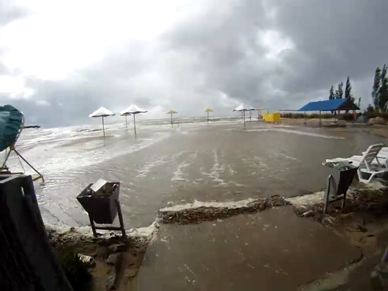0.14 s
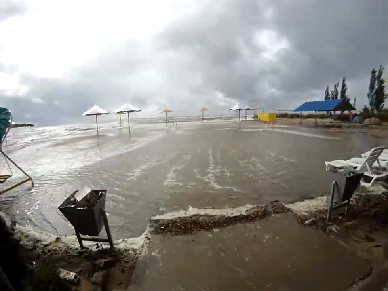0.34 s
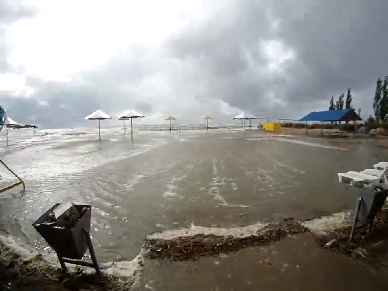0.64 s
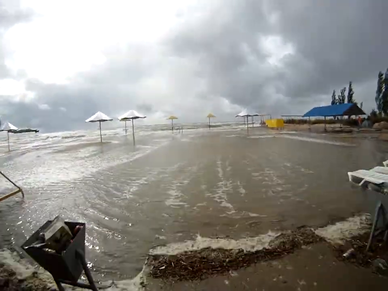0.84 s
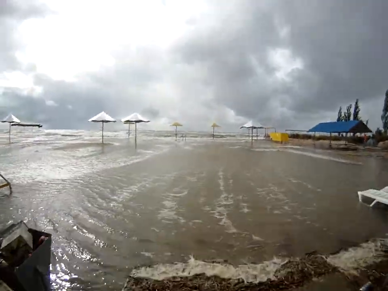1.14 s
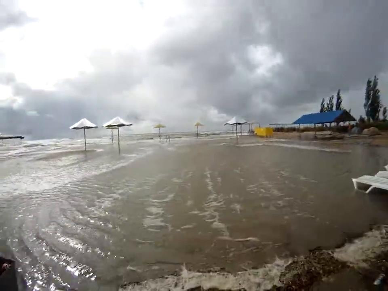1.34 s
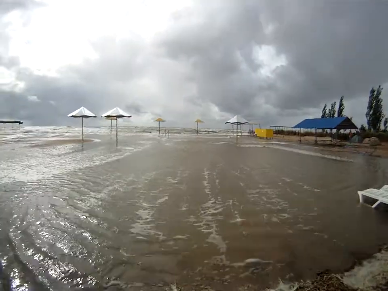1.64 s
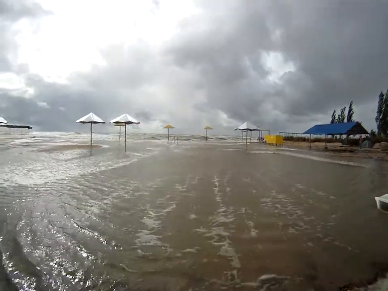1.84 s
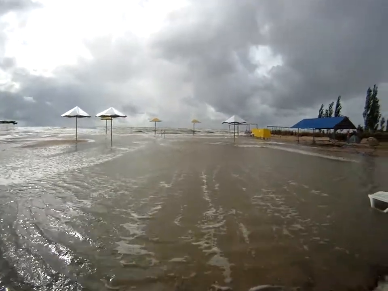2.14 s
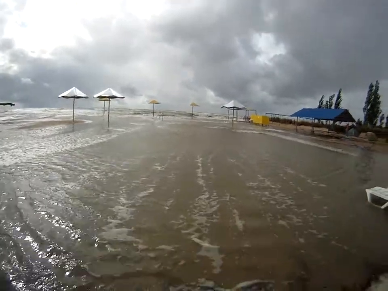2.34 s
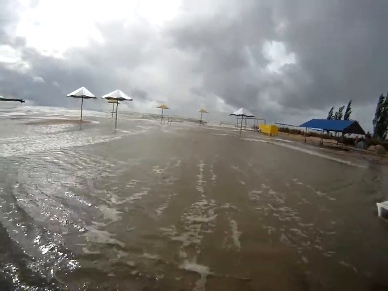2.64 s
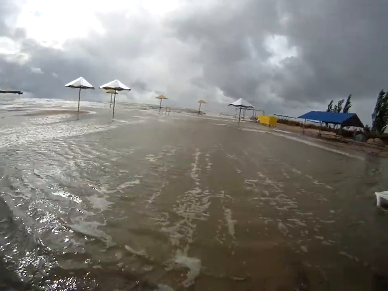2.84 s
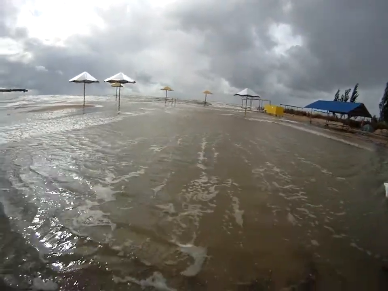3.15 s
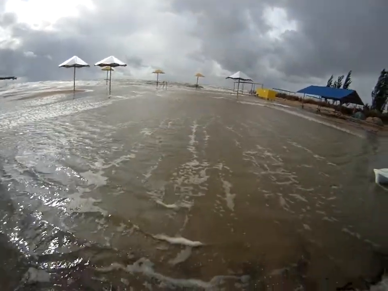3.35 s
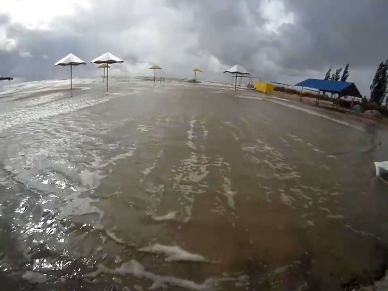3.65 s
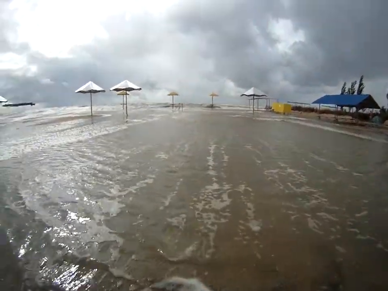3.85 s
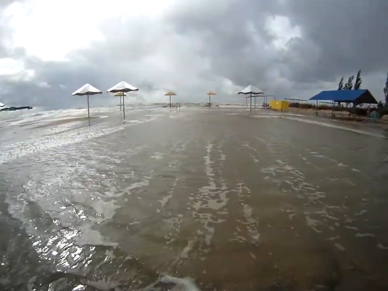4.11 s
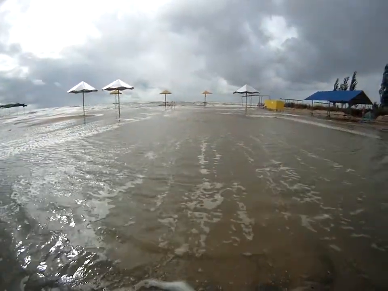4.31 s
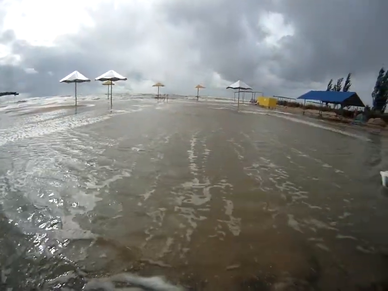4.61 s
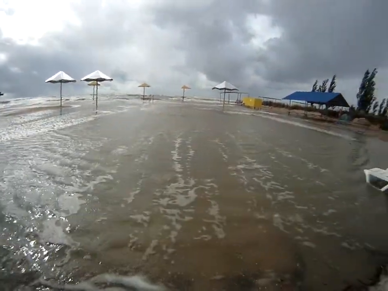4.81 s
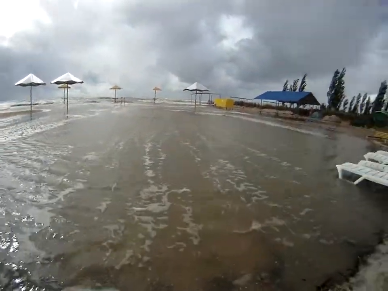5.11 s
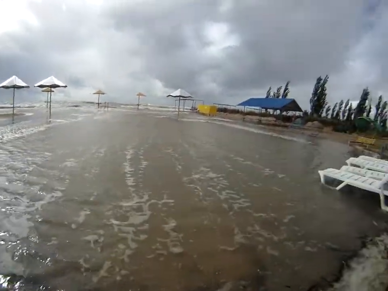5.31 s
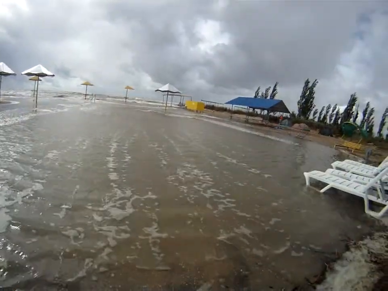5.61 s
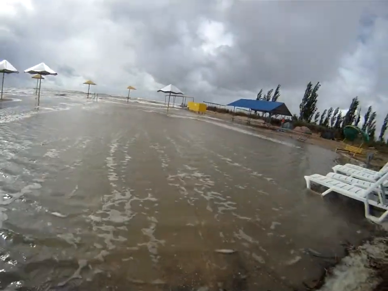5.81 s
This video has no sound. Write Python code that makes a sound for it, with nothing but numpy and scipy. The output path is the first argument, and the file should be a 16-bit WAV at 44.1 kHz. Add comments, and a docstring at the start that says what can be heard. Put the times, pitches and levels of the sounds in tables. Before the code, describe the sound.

A wet hand knocks, rubs and squeaks on a sealed plastic camera case, over dull hissing floodwater and gusting wind.

```python
"""Storm surf floods a beach in strong wind, heard from inside a hand-held camera's sealed plastic case.
The wash comes through the ringing case as a dull hiss, and gusts rumble on it.
Close by, knocks ring the case, a wet grip swishes and squeaks over it,
and its mount slips in two short runs of creaks."""
import sys
import numpy as np
from scipy import signal
from scipy.fft import rfft, irfft, next_fast_len
from scipy.io import wavfile
from scipy.ndimage import uniform_filter1d, map_coordinates

SR = 44100
rng = np.random.default_rng(int(sys.argv[2]) if len(sys.argv) > 2 else 0)


def output_pcm(signal):
    """Save a mono or channel-first signal as 16-bit PCM at the path in sys.argv[1].

    Samples are clipped to [-1, 1] before scaling.
    """
    pcm = np.clip(np.atleast_2d(signal).T, -1, 1) * 32767
    wavfile.write(sys.argv[1], SR, np.round(pcm).astype(np.int16))


N = 263263


def amp(db):
    """Decibels to gain."""
    return 10 ** (np.asarray(db) / 20)


def unit(x):
    """Scale to rms 1."""
    return x / np.sqrt(np.mean(x ** 2) + 1e-20)


def burst(x):
    """Scale to the energy of 10 ms at rms 1."""
    return x * np.sqrt(SR / 100 / (np.sum(x ** 2) + 1e-20))


def curve(points):
    """(seconds, value) points to one value per sample."""
    times_s, values = np.transpose(points)
    return np.interp(np.arange(N) / SR, times_s, values)


def wobble(rate_hz):
    """Smooth random curve with knots at rate_hz."""
    knots = rng.standard_normal(int(N * rate_hz / SR) + 4)
    return map_coordinates(knots, [np.arange(N) * rate_hz / SR])


def patchy(depth_db):
    """Noise whose gain drifts in patches of time and frequency; rms 1."""
    spectra = signal.stft(rng.standard_normal(N), nperseg=512)[2]
    patches = uniform_filter1d(rng.standard_normal(spectra.shape), size=6, axis=0)
    patches = unit(uniform_filter1d(patches, size=12, axis=1))
    return unit(signal.istft(spectra * amp(depth_db * patches), nperseg=512)[1][:N])


def grains(rate_hz, spread_db):
    """Random impulses of uneven size; rms 1."""
    impulses = (rng.random(N) < rate_hz / SR) * rng.choice([-1, 1], N)
    return unit(impulses * amp(spread_db * np.clip(rng.standard_normal(N), -2, 2)))


def filtered(x, response):
    """Zero-phase filter with gain response(hz)."""
    size = next_fast_len(N + SR // 2)
    return irfft(rfft(x, size) * response(np.fft.rfftfreq(size, 1 / SR)), size)[:N]


def through_case(x, spectrum):
    """Colour x by (Hz, dB) points and by the case's resonances; rms 1."""
    # Case resonances and notches. Each row: centre in Hz, width in Hz, lift in dB.
    resonances = [(897, 107, 4.5), (1274, 144, 6), (2140, 310, 7.5), (3654, 335, 10), (5990, 470, -7),
                  (8410, 430, 10.5), (9770, 560, 11.5), (11980, 1230, -15), (14270, 400, 10)]
    points_hz, points_db = np.transpose(spectrum)

    def response(hz):
        source_db = np.interp(np.log(hz + 1), np.log(points_hz + 1), points_db)
        case_db = sum(db / (1 + (2 * (hz - centre) / width) ** 2) for centre, width, db in resonances)
        return amp(source_db + case_db)
    return unit(filtered(x, response))


def flood():
    """Surf and shallow ripples merge into a wash; flecks of spray tick on the case."""
    # Slow surge. Each row: time in seconds, level in dB.
    surge = [(0, -50), (.6, -49.5), (.95, -51), (1.7, -49), (2.3, -52), (3.7, -51.5), (4.95, -48.5),
             (5.4, -52.5), (5.97, -51)]
    # Spectra of wash and spray. Each row: frequency in Hz, relative density in dB.
    water_spectrum = [(80, -2.5), (200, 3.5), (400, 0), (700, -3), (1250, -2), (1550, -6), (2400, 1.5),
                      (3000, -5), (4200, -10), (5200, -13), (6000, -21), (7100, -15), (9500, -16),
                      (15000, -17)]
    spray_spectrum = [(1500, -36), (4500, 8), (7500, 8), (10000, -36), (15000, -25)]
    foam = patchy(depth_db=2) + 0.37 * grains(rate_hz=400, spread_db=8)
    swell = amp(curve(surge) + 0.5 * wobble(rate_hz=9))
    spray = amp(-78) * through_case(grains(rate_hz=4, spread_db=3), spray_spectrum)
    return swell * through_case(foam, water_spectrum) + spray


def wind():
    """Gusts press on the case in uneven lumps."""
    # Strength of the low rumble; besides the gusts it swells near 2.8 s, where the grip's slide shakes the
    # case. Each row: time in seconds, relative level in dB.
    strength = [(0.0, -51), (1.18, -51.5), (1.48, -49), (2.48, -53), (2.79, -45.5), (3.21, -52),
                (4.51, -51), (4.82, -45.5), (5.2, -53), (5.97, -47)]
    # Rumble spectrum. Each row: frequency in Hz, relative density in dB.
    rumble_spectrum = [(15, -1), (28, -2.5), (50, -1.5), (110, -7), (200, -14), (350, -20.5), (600, -41),
                       (3000, -90)]
    buffet_db = 1.5
    lumps = amp(wobble(rate_hz=8) + 1.8 * wobble(rate_hz=35))
    rumble = through_case(patchy(depth_db=2.5), rumble_spectrum)
    return amp(curve(strength) + buffet_db) * unit(lumps * rumble)


def blows(events, modes, thump_hz, thump_t60_s, contact_s, chatter_db, chatter_t60_s):
    """Each blow thumps the whole case and rings its wall and lid, which shake the small parts."""
    # Bands radiated by wall, lid and small parts. Each row: low edge in Hz, high edge in Hz.
    bands_hz = [(680, 1550), (1550, 3800), (7000, 15400)]
    bandpasses = [signal.butter(3, edges, "bandpass", fs=SR, output="sos") for edges in bands_hz]
    lowpass = signal.butter(2, 650, fs=SR, output="sos")
    mode_hz, mode_db, t60_s = np.transpose(modes)[:, :, None]
    out, t = np.zeros(N + SR), np.arange(SR // 12) / SR
    for start_s, thump_db, wall_db, lid_db in events:
        detuned_hz = mode_hz * (1 + 0.012 * rng.standard_normal(mode_hz.shape))
        struck_db = mode_db + 2 * rng.standard_normal(mode_hz.shape)
        rings = amp(struck_db - 60 * t / t60_s) * np.cos(2 * np.pi * detuned_hz * t)
        force = amp(chatter_db - 60 * t / chatter_t60_s) * rng.standard_normal(len(t))
        force[0] = 1  # first touch, then chatter
        flex_envelope = (1 - np.exp(-t / contact_s)) * amp(-60 * t / thump_t60_s)
        flex = flex_envelope * np.sin(2 * np.pi * thump_hz * amp(rng.normal()) * t)
        trapped_air = np.diff(flex, prepend=0)  # follows the wall's speed
        hit = amp(thump_db) * burst(signal.sosfilt(lowpass, trapped_air))
        small_parts_gain = np.hypot(amp(wall_db - 15), amp(lid_db - 10.5))
        gains = amp(wall_db), amp(lid_db), small_parts_gain
        for (low_hz, high_hz), bandpass, gain in zip(bands_hz, bandpasses, gains):
            part_ring = np.sum(rings * ((mode_hz >= low_hz) & (mode_hz < high_hz)), axis=0)
            driven = signal.fftconvolve(part_ring, force)[:len(t)]
            hit += gain * burst(signal.sosfilt(bandpass, driven))
        out[round(start_s * SR):][:len(t)] += hit
    return out[:N]


def sway(events, sway_hz, t60_s):
    """After a push the whole camera swings back in the hand."""
    out, t = np.zeros(N + SR), np.arange(SR // 6) / SR
    swing = burst(np.sin(2 * np.pi * sway_hz * t) * amp(-60 * t / t60_s))
    for start_s, thump_db, *_ in events:
        out[round(start_s * SR):][:len(t)] -= amp(thump_db) * swing
    return out[:N]


def knocks():
    """Knocks ring the plastic shell and set the camera swaying."""
    # Knocks on the case. Each row: start in seconds, thump in dB, wall in dB, lid in dB.
    hits = [(0.1028, -38.5, -45.5, -41), (0.2965, -65, -69, -46), (0.789, -30.5, -34, -34.5),
            (1.4105, -31, -36, -26.5), (1.467, -42, -47, -68), (1.482, -39.5, -42, -44),
            (1.51, -39, -40.5, -62), (1.5525, -37.2, -49.8, -64), (1.7352, -43.5, -60, -64),
            (2.0192, -33, -39, -34.5), (2.084, -49, -55, -45.4), (2.0955, -54, -69, -49),
            (2.572, -42.5, -53.5, -71), (2.621, -30.5, -59, -48), (2.666, -38, -67, -55),
            (2.767, -38, -43, -60), (2.792, -45, -66, -65), (2.926, -41.5, -44, -50),
            (2.933, -33.5, -43, -39.5), (3.0875, -39.5, -60, -55), (3.2407, -50.5, -68, -47.5),
            (3.2702, -58, -46, -44.5), (3.318, -38, -62, -59), (3.6338, -24, -31, -27),
            (3.7298, -41.5, -41, -56), (3.736, -50, -50, -40), (3.789, -31, -36.5, -33.5),
            (4.139, -60, -43.5, -46), (4.1787, -52, -41, -59), (4.198, -41, -50, -43.5),
            (4.246, -55, -52, -42.5), (4.3455, -60, -59, -43.5), (4.59, -43, -32.5, -38),
            (5.0395, -37.5, -50, -41.5), (5.1585, -42.5, -57, -56), (5.267, -40.5, -58, -68),
            (5.68, -32.5, -45.5, -50), (5.808, -34, -49, -75)]
    # Shell modes. Each row: frequency in Hz, relative level in dB, T60 in seconds.
    shell_modes = [(975, 0, 0.03), (1302, 8.5, .016), (1540, 2, 0.013), (1900, -3, 0.0053),
                   (2127, 1, 0.015), (3240, -13, 0.016), (3500, -13, 0.023), (8520, 3.5, 0.012),
                   (9920, 9.5, 0.013), (11000, -4, 0.0091), (13400, 4, .005), (14000, 7, 0.0078)]
    struck = blows(hits, shell_modes, thump_hz=82.4, thump_t60_s=0.02, contact_s=0.00065,
                   chatter_db=-12, chatter_t60_s=0.004)
    return struck + amp(-8.5) * sway(hits, sway_hz=32, t60_s=0.1)


def stroke_gains():
    """Drag and hiss gains: each stroke starts fast, presses a little harder and lets go."""
    # Grip strokes. Each row: start in seconds, length in seconds, level in dB, hiss re drag in dB.
    strokes = [(0.253, 0.014, -49, -3), (0.461, 0.048, -45.5, -7.5), (2.659, 0.03, -42, -2.5),
               (2.708, 0.18, -42.5, -13), (3.016, 0.18, -41.5, -10), (3.282, 0.13, -44.5, -7.5),
               (3.435, 0.088, -44.5, -7.5), (3.624, 0.016, -36.5, -7), (3.782, 0.19, -48, -8.5),
               (4.022, 0.14, -48.5, -7.5), (4.378, 0.4, -46.5, -8.5), (4.574, 0.078, -34, -15),
               (4.641, 0.078, -38, -8), (4.706, 0.051, -44, -13)]
    attack_s, release_s, swell_db_per_s = 0.0077, 0.013, 6.5
    gains, t = np.zeros((2, N)), np.arange(N) / SR
    for start_s, length_s, level_db, hiss_db in strokes:
        age_s = t - start_s
        attack = np.clip(age_s / attack_s + 0.5, 0, 1)
        hold = amp(level_db + swell_db_per_s * np.clip(age_s, 0, length_s))
        release = np.exp(-np.maximum(age_s - length_s, 0) / release_s)
        gains = np.hypot(gains, np.outer([1, amp(hiss_db)], attack * hold * release))
    return gains


def catch_gain():
    """Wet skin catches; each squeak swells and fades as a bell curve."""
    # Squeaks. Each row: middle in seconds, width at half height in seconds, peak level in dB.
    squeaks = [(2.678, 0.028, -36.5), (2.74, 0.029, -41), (2.897, .019, -31), (3.065, 0.021, -39),
               (3.168, 0.026, -39.5), (3.243, 0.0027, -34.5), (3.337, .055, -37), (3.486, 0.052, -43),
               (3.869, 0.044, -43.5), (3.928, 0.018, -41.5), (4.388, .016, -38), (4.442, 0.047, -32),
               (4.546, 0.082, -29.5), (4.683, 0.055, -36)]
    t = np.arange(N) / SR
    return sum(amp(db) * 0.5 ** ((2 * (t - middle_s) / width_s) ** 2)
               for middle_s, width_s, db in squeaks)


def grip():
    """Countless tiny slips of a wet grip make a low drag, a hoarse squeak and a hiss."""
    # Friction spectra. Each row: frequency in Hz, relative density in dB.
    drag_spectrum = [(100, 2), (300, -8.5), (680, -12.5), (850, -6), (1100, -3.5), (1600, -1), (2000, -1),
                     (2450, 0.5), (3000, -2.5), (5000, -26.5)]
    squeak_spectrum = [(1500, -50), (2450, -17), (2850, -3), (3170, 2), (3480, -10), (4300, -28),
                       (8200, -42), (9050, -9), (9800, -42), (14400, -45), (15200, -9)]
    hiss_spectrum = [(2500, -72), (3800, -8), (4400, 5), (5300, 3.5), (6000, -5.5), (7000, 2.5),
                     (8300, -4.5), (9050, 3.5), (10000, -7), (10800, -1.5), (12000, -42), (13300, -4.5),
                     (14300, -3), (15200, -9.5)]
    judder_db, squeak_hiss_db = 2, -12

    def friction(spectrum):
        slips = patchy(depth_db=3.5) + 0.61 * grains(rate_hz=1500, spread_db=2.5)
        return through_case(slips, spectrum)

    drag_gain, hiss_gain = stroke_gains()
    squeak_gain = catch_gain()
    judder = amp(judder_db * wobble(rate_hz=69.56))  # uneven stick and release
    drag = drag_gain * friction(drag_spectrum)
    squeak = squeak_gain * friction(squeak_spectrum)
    hiss = np.hypot(amp(squeak_hiss_db) * squeak_gain, hiss_gain) * friction(hiss_spectrum)
    return judder * (drag + squeak + hiss)


def cracks(slips, t60_s):
    """Each slip starts with a dry, broad snap that scales with the lid's ring."""
    # Snap spectrum. Each row: frequency in Hz, relative density in dB.
    snap_spectrum = [(200, -22), (550, 22), (900, 18.5), (2500, -18), (5000, 8.5), (8000, -49), (15000, -5)]
    out, t = np.zeros(N + SR), np.arange(SR // 50) / SR
    for start_s, _, _, lid_db in slips:
        snap = burst(amp(-60 * t / t60_s) * rng.standard_normal(len(t)))
        out[round(start_s * SR):][:len(t)] += amp(lid_db) * snap
    return np.std(out[:N]) * through_case(out[:N], snap_spectrum)


def creak():
    """The mount slips in two quick runs; each slip snaps and rings it."""
    # Slips of the mount. Each row: start in seconds, thump in dB, wall in dB, lid in dB.
    slips = [(0.7212, -44, -39, -47), (0.7304, -57, -35.5, -42), (0.744, -37.5, -30, -33),
             (0.7761, -57, -26.5, -27), (3.5407, -51, -53, -35.5), (3.558, -45, -39, -36),
             (3.5724, -43, -41, -38), (3.5907, -58, -41, -38.5), (3.6142, -40, -59, -34)]
    # Mount modes. Each row: frequency in Hz, relative level in dB, T60 in seconds.
    mount_modes = [(660, -12, .012), (740, -1, 0.01), (855, 15, 0.013), (920, 15, 0.013), (1280, 8, 0.015),
                   (1480, -6, 0.0044), (2000, 3, .016), (2330, 10, 0.0042), (2630, -12.5, 0.03),
                   (3200, -14, 0.0056), (3610, -11, .01), (7000, 6, .005), (8150, -2, 0.0048),
                   (9100, 1, .005), (9800, 5, 0.0059), (10600, 5, 0.0049), (13300, 1, .005),
                   (14200, 0.5, 0.0056)]
    struck = blows(slips, mount_modes, thump_hz=69.6, thump_t60_s=0.024, contact_s=0.00026,
                   chatter_db=-17, chatter_t60_s=0.018)
    return struck + amp(-5.5) * cracks(slips, t60_s=0.019)


def scene():
    """Handling on the case, wind and water outside; mono."""
    return (knocks() + creak() + wind() + flood() + grip())[None]


def record(dry):
    """The camera cuts off steeply at its band limit."""
    limit_hz = 15400
    return filtered(dry[0], lambda hz: 1 / np.sqrt(1 + (hz / limit_hz) ** 160))[None]


dry = scene()
out = record(dry)
output_pcm(out)
```